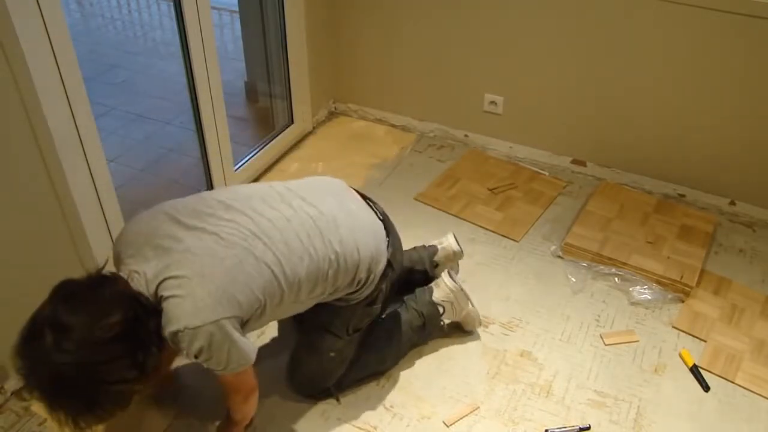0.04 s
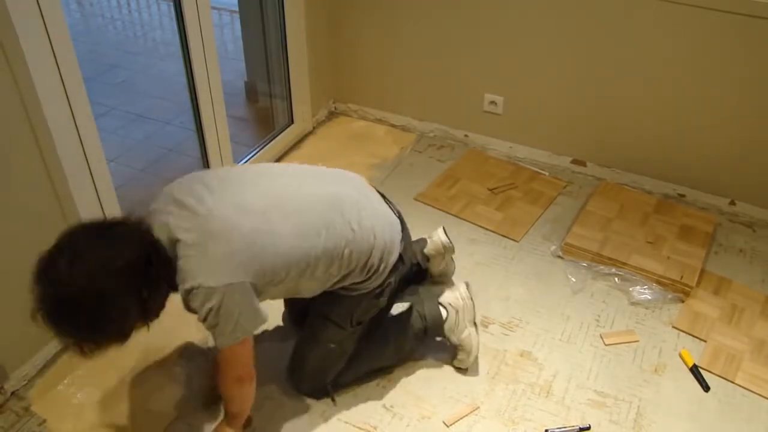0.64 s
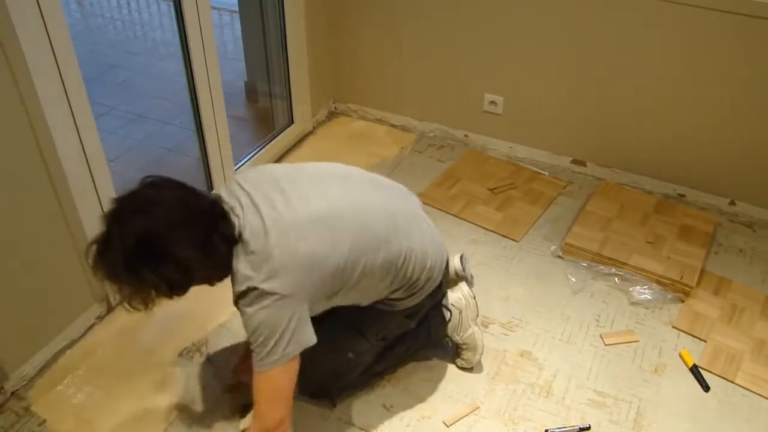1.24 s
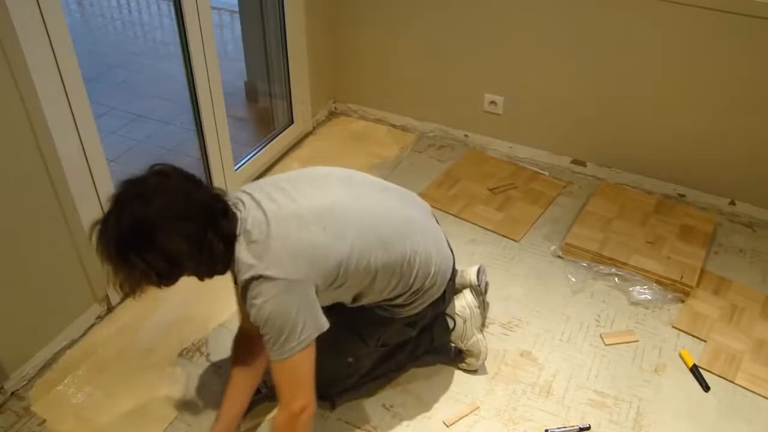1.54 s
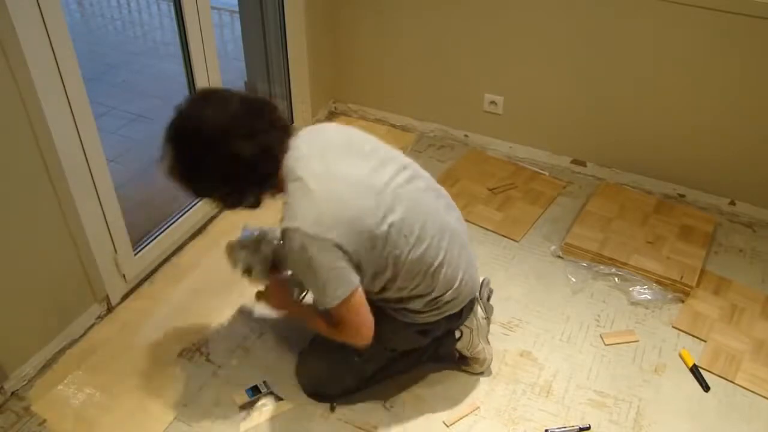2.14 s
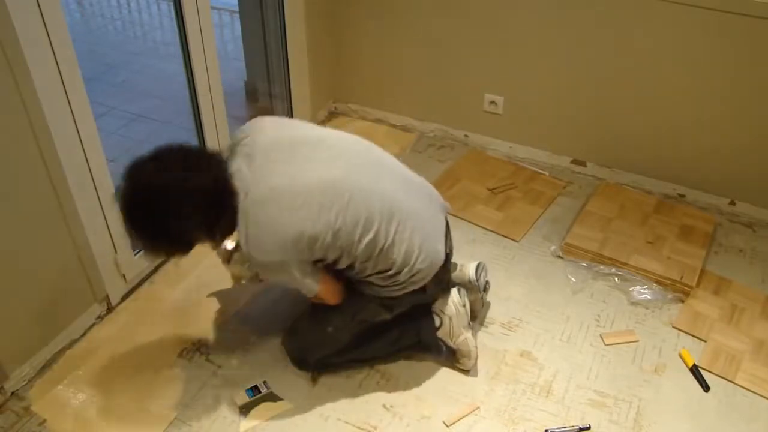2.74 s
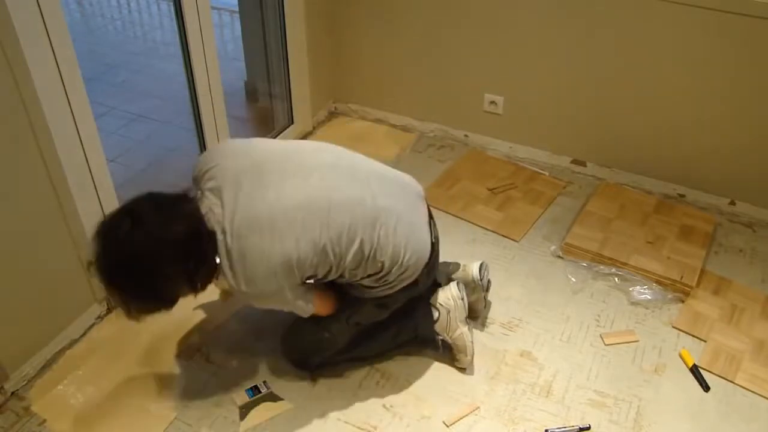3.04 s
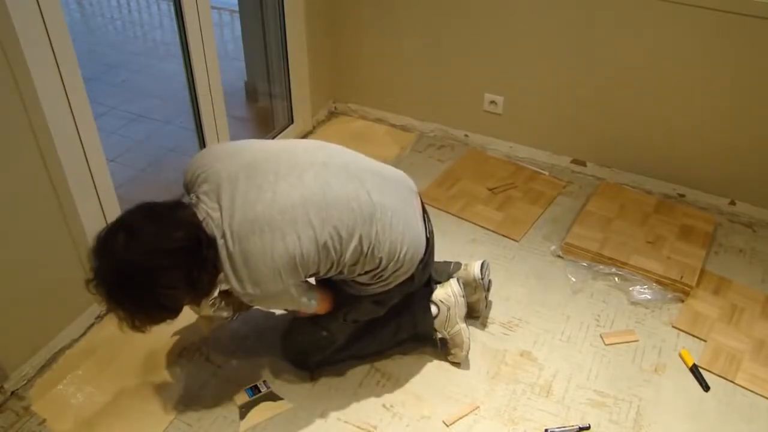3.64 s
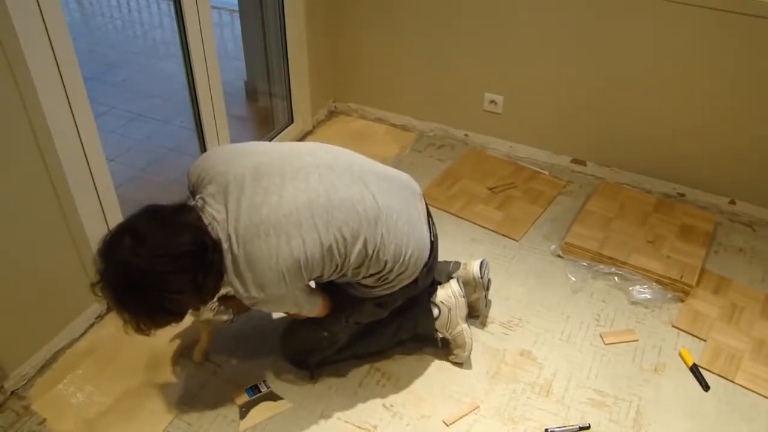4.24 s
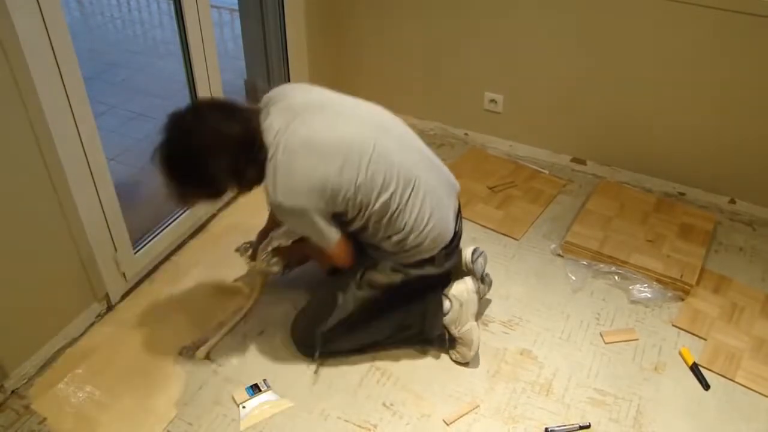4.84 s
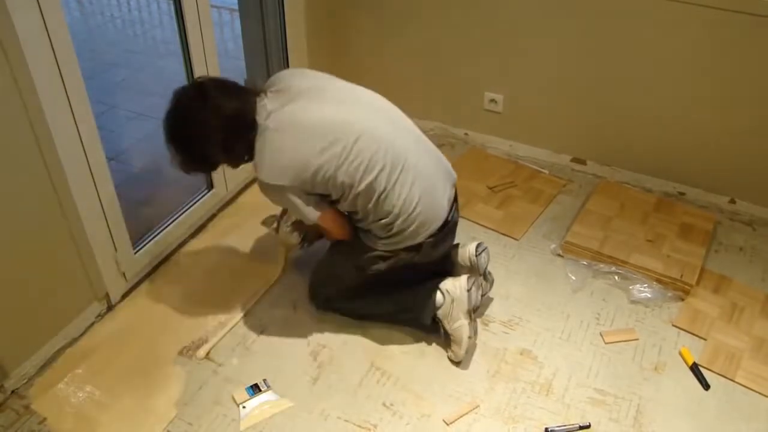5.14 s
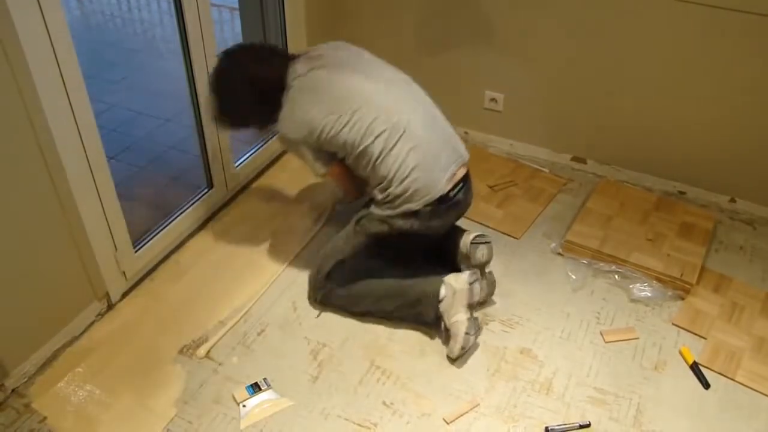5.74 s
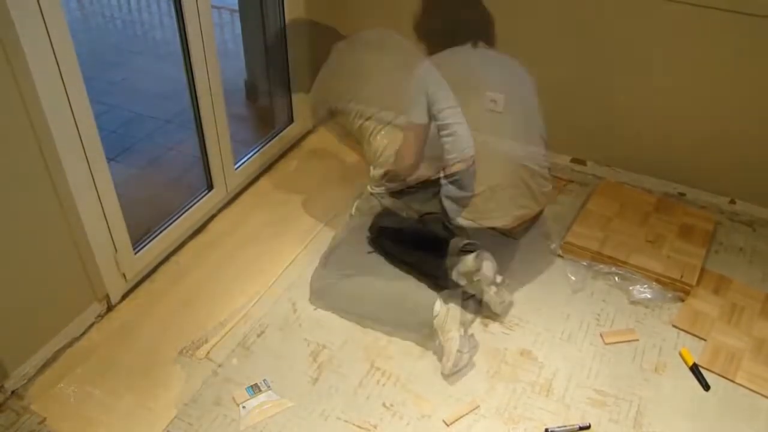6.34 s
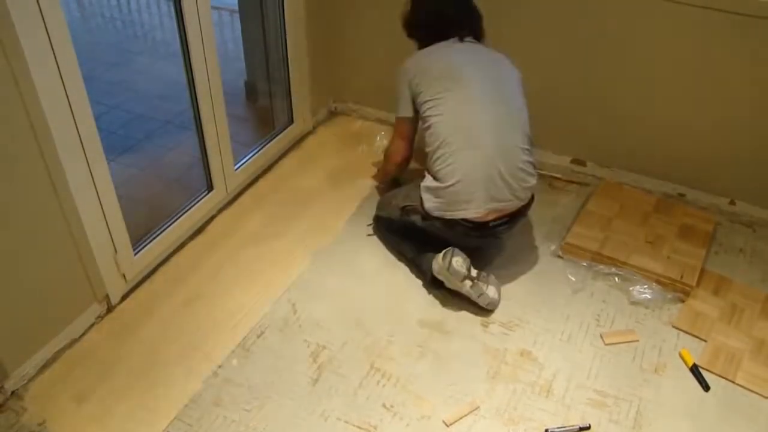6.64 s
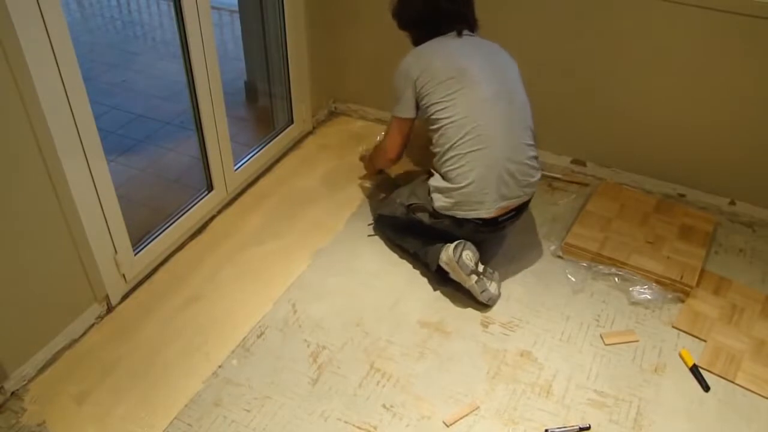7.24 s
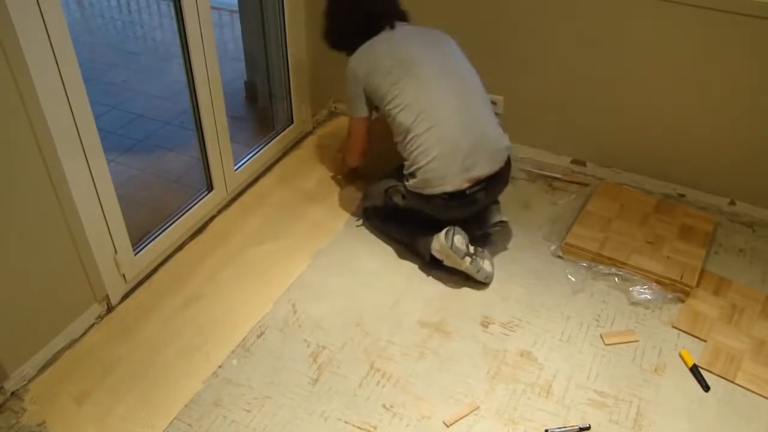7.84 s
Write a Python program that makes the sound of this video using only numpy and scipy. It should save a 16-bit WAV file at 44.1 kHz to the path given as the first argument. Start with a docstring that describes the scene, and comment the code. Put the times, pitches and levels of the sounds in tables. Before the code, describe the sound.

In a bare room, long ringing trowel scrapes give way to shuffling and light crinkling before short, juddering scrapes return.

```python
"""A bare, echoing room; one microphone within earshot of a kneeling worker spreading floor adhesive.
First a steel trowel rasps over the concrete in long strokes, its blade singing; twice the tone overloads
with a click. From 2 s knees and shoes shuffle along while a foil pouch, squeezed out, crinkles and creaks,
the crinkles more echo than direct sound. From 6 s the trowel scrapes and judders in the corner."""
import sys
import numpy as np
from scipy import signal
from scipy.fft import rfft, irfft
from scipy.io import wavfile

SR = 44100
rng = np.random.default_rng(int(sys.argv[2]) if len(sys.argv) > 2 else 0)


def generate_wav(signal):
    """Clip the signal to [-1, 1] and save it as 16-bit WAV at the path in sys.argv[1]."""
    frames = np.transpose(np.atleast_2d(signal))
    scaled = np.clip(frames, -1, 1) * 32767
    pcm = np.round(scaled).astype(np.int16)
    wavfile.write(sys.argv[1], SR, pcm)


N = 357651
TIME = np.arange(N) / SR
FREQS = np.maximum(np.arange(N // 2 + 1) * SR / N, 1)

# Levels in the tables are relative; each source adds its own gain.
# Reverberation of the bare walls: frequency_hz, t60_s
WALL_DECAY = [(200, 1.2), (530, 1.2), (1400, 0.71), (3700, 0.6), (7000, 0.55)]
# Spectrum of each sound: frequency_hz, level_db
ROOM_TONE_SPECTRUM = [(88, -57), (150, -30.5), (299, -4.5), (543, -5), (3340, -4.5), (3740, -7.5),
                      (6250, -19.5), (7000, -41.5), (9100, -72), (15400, -120)]
SHUFFLE_SPECTRUM = [(53, -83.5), (90, -38.5), (228, -19), (346, -12), (439, -11), (567, -4.5), (609, -5.5),
                    (944, 2.5), (1380, 1.5), (1790, 0.5), (2070, -6), (4360, -22), (5940, -33.5),
                    (7000, -54), (9100, -84), (15400, -120)]
FOIL_SPECTRUM = [(80, -34), (200, -7.5), (600, -11), (1500, 1.5), (2200, -1), (3500, -1.5), (5000, -6),
                 (6800, -22.5)]
CATCH_SPECTRUM = [(100, -51), (300, -10), (700, -14.5), (1500, 0), (2800, -4.5), (4500, -21), (6800, -30.5)]
CORNER_SPECTRUM = [(71, -57.5), (120, -33.5), (172, -37.5), (237, -14), (276, -17), (350, -2), (395, -9),
                   (460, -5.5), (518, -4.5), (940, 1), (1300, 1), (2790, -2.5), (4060, -11), (6320, -28),
                   (7000, -48), (9100, -75), (15400, -120)]
SWEEP_SPECTRUM = [(90, -88.5), (150, -52.5), (230, -37), (320, -25), (390, -24), (440, -19.5), (700, -9.5),
                  (1100, 1), (1400, -1.5), (1750, 3), (2200, -5), (2890, -4.5), (4320, -9), (6250, -24),
                  (7000, -45.5)]
# Resonances that colour the rubbing: centre_hz, width_hz, lift_db
SHUFFLE_RESONANCES = [(238, 21, 1.6), (544, 48, 1.1), (735, 35, 1), (1120, 82, 3)]
CORNER_RESONANCES = [(243, 21, 4.8), (450, 34.4, 4), (640, 44, 4), (837, 35, 3), (958, 45, 2.7),
                     (1130, 40, 2), (1330, 46, 2.4), (1410, 20, 3), (2527, 27, 1.5), (4112, 13, 4)]
BLADE_RESONANCES = [(870, 63, 2), (1500, 62, 3.5), (1560, 39, 0.5), (1665, 40, 6), (2890, 610, 5),
                    (3160, 50, 4.5), (3900, 70, -0.5), (3920, 40, 5), (4300, 36, 4.5)]
# Drags over the floor: start_s, rise_s, length_s, level_db, body_db, grit_db (last two re level_db)
KNEE_SHUFFLES = [(2.04, 0.011, 0.089, -37, -10.5, 8), (2.21, .03, 0.12, -34, -12, -2.5),
                 (2.33, .05, 0.046, -21, -7.5, -6), (2.52, 0.027, 0.18, -33.5, -10, -4),
                 (2.825, 0.033, .1, -38, -14, 3), (3.05, .04, 0.041, -36.5, -8.5, 9.5),
                 (3.2, 0.048, 0.087, -44.5, -8.5, 4.5), (3.32, .03, 0.11, -31, -2.5, 2),
                 (3.46, .03, 0.13, -35.5, -11.5, 4), (3.695, .015, .05, -39.5, -10, 6),
                 (3.85, 0.056, 0.55, -48, 0, 0.5), (4.105, .01, .06, -46, -11.5, 8),
                 (4.28, 0.022, .05, -25, -13, -5.5), (4.31, .05, 0.091, -22.5, -9.5, -8.5),
                 (4.5, .05, 0.22, -41, -9, -6.5), (4.73, .025, .05, -28.5, -20, -10),
                 (4.805, 0.03, 0.095, -20, -15, -4), (4.99, .06, .1, -29, -5, 2),
                 (5.08, .04, 0.037, -30.5, -13.5, 5.5), (5.265, .04, 0.089, -14.5, -15, -5.5),
                 (5.57, 0.018, 0.036, -23.5, -13, -6.5), (5.745, .01, 0.024, -43, -10.5, 3),
                 (5.81, .02, 0.018, -38, -4.5, 0.5), (5.96, 0.051, .13, -49.5, -12, 2)]
CORNER_SCRAPES = [(6.19, 0.013, .04, -33, -9, 4), (6.235, .01, .09, -22, -17, -1.5),
                  (6.29, .09, 0.2, -18, -10.5, -5), (6.66, .04, .08, -34.5, -11, 3.5),
                  (6.75, 0.025, 0.048, -30, -8.5, 1), (6.94, 0.065, 0.18, -30.5, -10.5, -7),
                  (7.08, .05, 0.24, -31.5, -8, -2.5), (7.258, .016, 0.062, -13.5, -3.5, -4),
                  (7.38, .06, 0.22, -16, -5.5, -5.5), (7.52, 0.028, 0.074, -16, -9, -4.5),
                  (7.67, 0.033, 0.086, -25.5, -7, -4.5), (7.83, .11, 0.13, -13.5, -15, -3.5),
                  (8.0, .05, 0.13, -26.5, -4, -2)]   # choppy trowel strokes
TROWEL_SWEEPS = [(0.0, 0.002, 0.16, -24.5, -9, -1.5), (0.39, 0.03, 0.12, -41, -17, -1),
                 (0.481, 0.013, .055, -23.5, -20, -6), (0.542, 0.023, 0.029, -22.5, -2.5, 5.5),
                 (0.57, 0.022, 0.18, -16.5, -25.5, 0.5), (0.83, 0.022, 0.1, -23, -8.5, -8.5),
                 (1.09, 0.035, 0.045, -33, -7, 4), (1.14, 0.014, 0.054, -24, -7.5, 3.5),
                 (1.228, 0.013, 0.15, -20.5, -10.5, 4), (1.4, .04, 0.1, -31.5, -14, 5),
                 (1.55, 0.035, 0.07, -26, -18, 2), (1.67, 0.016, 0.033, -36.5, 1.5, -3),
                 (1.78, .012, 0.015, -44.5, -13.5, 9.5), (1.93, .06, .1, -45, -5, 2.5)]   # long trowel strokes
# Friction tones: start_s, rise_s, length_s, level_db, pitch_hz
POUCH_CREAKS = [(2.12, .02, 0.049, -33, 1520), (2.62, 0.014, 0.069, -40.5, 1690),
                (2.75, 0.017, 0.026, -35.5, 1820), (2.83, .03, .14, -39, 1920)]
BLADE_JUDDERS = [(7.265, .015, .08, -23, 338), (7.54, .04, 0.12, -23, 369.2)]   # against the floor in the corner
BLADE_DAMPED_RING = [(0.0, .02, .17, -26.5, 1230), (0.57, .05, .2, -17.5, 1360),
                     (1.235, 0.015, .07, -17.5, 1580), (6.33, .11, .15, -23, 1532),
                     (7.86, .09, .12, -22.5, 1383)]   # below the main ring
BLADE_MAIN_RING = [(0.0, .02, 0.1, -34, 1615), (0.565, .05, 0.083, -10.5, 1643),
                   (0.68, .04, 0.079, -18.5, 1677), (1.15, .01, .08, -19.5, 1623),
                   (1.232, 0.0091, 0.11, -8.5, 1690), (1.38, .03, .085, -12.5, 1715),
                   (1.52, .03, .045, -21.5, 1710), (1.62, .03, 0.078, -26, 1712),
                   (1.8, 0.051, .17, -42, 1670)]   # set off by the long strokes
# Folds of the pouch buckling: time_s, level_db, ring_hz
FOIL_FOLDS = [(2.0495, -13.5, 3070), (2.1364, -25.5, 1530), (2.642, -38.5, 1740), (2.757, -17.5, 1850),
              (2.8243, -11.5, 3070), (3.0042, -18, 1910), (3.0618, -21, 2570), (3.0932, -18.5, 1880),
              (3.24, -25, 4320), (3.2838, -23.5, 1550), (3.3063, -17.5, 2560), (3.3176, -10, 1780),
              (3.4831, -12.5, 2957), (3.7, -14.5, 3390), (3.9424, -21.5, 1200), (4.0239, -21, 1345),
              (4.1076, -21, 1410), (4.5887, -24.5, 1780)]
# Steel or shoe lands and catches on the concrete: time_s, level_db
FLOOR_CATCHES = [(0.489, -14), (1.147, -3.5), (1.237, 2.5), (4.298, -23), (4.75, -21.5), (4.823, -26.5),
                 (5.283, -13.5), (5.581, -15), (6.198, -28.5), (6.236, -19.5), (7.270, 2)]
# Overload clicks: time_s, depth_full_scales, half_length_s
OVERLOAD_CLICKS = [(0.7117, 1.7, .00001), (1.2741, 2.0, .00003)]

# How a push eases off: sag_db_per_s, release_db_per_s
SHUFFLE_EASING, CORNER_EASING, SWEEP_EASING, TONE_EASING = (12, 101.5), (10, 75), (14, 80), (15, 160)
FLAT_SHARE, SETTLE_S = .035, .06   # a tone starts flat and rises to pitch as the pressure builds
BODY_EDGE_HZ, GRIT_EDGE_HZ = 700, 2400
MIC_TOP_HZ, CUTOFF_HZ = 6650, 15800


def from_db(db):
    """Decibels to gain."""
    return 10 ** (np.asarray(db) / 20)


def rms_one(x):
    """Scale to unit rms."""
    return x / np.sqrt(np.mean(x ** 2) + 1e-20)


def at_hz(points, hz):
    """Read a table along a log-frequency axis."""
    f, value = np.transpose(points)
    return np.interp(np.log(hz), np.log(f), value)


def coloured(x, spectrum, lift_db=0):
    """Minimum-phase filter that follows a spectrum table, plus a lift at each of FREQS."""
    gain = from_db(at_hz(spectrum, FREQS) + lift_db)
    half = 4096
    grid = np.linspace(0, SR / 2, half + 1)
    cepstrum = irfft(np.log(np.interp(grid, FREQS, gain) + 1e-6))
    cepstrum[1:half] *= 2
    cepstrum[half + 1:] = 0
    impulse = irfft(np.exp(rfft(cepstrum)))[:half]
    return signal.oaconvolve(x, impulse)[:N]


def drift(turns_per_s):
    """A smooth random wobble; rms 1."""
    knots = rng.standard_normal(N // 20)
    return rms_one(np.interp(TIME * turns_per_s, np.arange(len(knots)), knots))


def grains(per_s, spread_db):
    """Tiny random snaps, as of sand breaking under an edge, a few of them large; rms 1."""
    sizes = from_db(spread_db * np.minimum(rng.exponential(1, N), 4)) * rng.choice([-1, 1], N)
    return rms_one(sizes * (rng.random(N) < per_s / SR))


def burst(start_s, decay_s, texture):
    """A sudden contact that dies away; its power starts near one."""
    fade = (TIME >= start_s) * np.exp(-np.clip((TIME - start_s) / decay_s, 0, 50))
    return rms_one(texture * fade) * np.std(fade)


def push(start_s, rise_s, length_s, easing):
    """Gain of one push: it builds up, sags while held, and dies away when let go."""
    sag_db_per_s, release_db_per_s = easing
    t = TIME - start_s
    held_s = np.clip(t - rise_s, 0, max(length_s - rise_s, 0))
    released_s = np.maximum(t - length_s, 0)
    fall_db = np.clip(sag_db_per_s * held_s + release_db_per_s * released_s, 0, 200)
    return np.clip(t / rise_s, 0, 1) * from_db(-fall_db)


def room_tone():
    """The faint, steady hiss of the quiet room."""
    return from_db(-53) * rms_one(coloured(rng.standard_normal(N), ROOM_TONE_SPECTRUM))


def walls(x, wet_db):
    """Bare walls answer with a dense tail in which the lows last longest; wetter sounds farther off."""
    t, tail = TIME[:SR], 0
    edges_hz = np.geomspace(90, 9000, 9)
    for low, high in zip(edges_hz, edges_hz[1:]):
        bandpass = signal.butter(2, [low, high], "band", fs=SR, output="sos")
        decay = np.exp(-np.log(1000) * t / at_hz(WALL_DECAY, np.sqrt(low * high)))
        tail = tail + signal.sosfilt(bandpass, rng.standard_normal(SR)) * decay
    tail = tail * (t > .003)   # the echo trails the direct sound
    echo = rms_one(signal.oaconvolve(x, tail)[:N]) * np.std(x)
    return (x + from_db(wet_db) * echo) / np.hypot(1, from_db(wet_db))


def wandering(x, depth=.42, turns_per_s=12, q=20.8):
    """The point of contact shifts, so narrow bands of the rasp swell and fade."""
    bands = (signal.lfilter(*signal.iirpeak(hz, q, fs=SR), x) for hz in np.geomspace(700, 6000, 20))
    return x + depth * sum(drift(turns_per_s) * band for band in bands)


def rubbing(strokes, easing, colour, resonances, middle_db, grains_per_s, spread_db, slips_per_s, slip_db):
    """A drag over gritty concrete sticks and slips; weight brings out the body, a sharp edge the grit."""
    power = np.array([(from_db(db) * push(start_s, rise_s, length_s, easing)) ** 2
                      for start_s, rise_s, length_s, db, _, _ in strokes])
    body_db, grit_db = np.transpose(strokes)[-2:]
    contact = rms_one(grains(grains_per_s, spread_db) * from_db(slip_db * drift(slips_per_s)))
    lift_db = sum(db / (1 + (2 * (FREQS - hz) / width) ** 2) for hz, width, db in resonances)
    spectrum = rfft(coloured(wandering(contact), colour, lift_db))
    body = 1 / (1 + (FREQS / BODY_EDGE_HZ) ** 8)
    grit = 1 / (1 + (GRIT_EDGE_HZ / FREQS) ** 8)
    bands = [(body, body_db), (1 - body - grit, np.full(len(strokes), middle_db)), (grit, grit_db)]
    return sum(rms_one(irfft(spectrum * band, N)) * np.sqrt(from_db(db) ** 2 @ power)
               for band, db in bands)


def friction_tone(pushes, width_hz, steadiness):
    """Friction feeds one resonance: a narrow, restless tone that follows the pressure."""
    power, weighted_pitch = 1e-20, 1e-20 * pushes[0][-1]
    for start_s, rise_s, length_s, db, pitch_hz in pushes:
        feed = (from_db(db) * push(start_s, rise_s, length_s, TONE_EASING)) ** 2
        glide = 1 - FLAT_SHARE * np.exp(-np.clip((TIME - start_s) / SETTLE_S, 0, 20))
        power = power + feed
        weighted_pitch = weighted_pitch + feed * pitch_hz * glide
    hz = weighted_pitch / power   # the strongest push sets the pitch
    pole = np.exp(-np.pi * width_hz / SR)
    kicks = rng.standard_normal(N) + 1j * rng.standard_normal(N)
    swing = signal.lfilter([1 - pole], [1, -pole], kicks)
    # friction limits the swing, so its strength varies less than its phase
    swing = swing / (np.abs(swing) + .26 * np.std(swing)) ** steadiness
    tone = np.real(swing * np.exp(2j * np.pi * np.cumsum(hz) / SR))
    bandpass = signal.butter(2, [hz.min() / 2, hz.max() * 2], "band", fs=SR, output="sos")
    return rms_one(signal.sosfilt(bandpass, tone)) * np.sqrt(power)


def shuffling():
    """Knees and shoes drag along the floor with a dull rasp."""
    return from_db(-1.5) * rubbing(
        KNEE_SHUFFLES, SHUFFLE_EASING, SHUFFLE_SPECTRUM, SHUFFLE_RESONANCES,
        middle_db=-2, grains_per_s=7000, spread_db=1.5, slips_per_s=150, slip_db=.1)


def pouch_creak():
    """The pouch creaks higher each time it is wrung tighter."""
    return from_db(2.5) * friction_tone(POUCH_CREAKS, width_hz=180, steadiness=.2)


def pouch_crinkle():
    """Each fold of foil buckles with a crack, a quick run of snaps and a dull ring of its own."""
    snaps, folds = grains(per_s=5500, spread_db=1.5), 0
    for time_s, db, ring_hz in FOIL_FOLDS:
        fold = burst(time_s, decay_s=.008, texture=snaps) + 1e-18
        fold[round(time_s * SR)] += 4   # the crack
        ring = signal.lfilter(*signal.iirpeak(ring_hz, 2, fs=SR), fold)
        folds = folds + from_db(db) * (fold + from_db(-.5) * ring)
    return from_db(-.5) * coloured(folds, FOIL_SPECTRUM)


def catches():
    """A hard edge crunches into the grit as it lands."""
    crunch = grains(per_s=5500, spread_db=4)
    blows = sum(from_db(db) * burst(time_s, decay_s=.0087, texture=crunch) for time_s, db in FLOOR_CATCHES)
    return from_db(3) * coloured(blows, CATCH_SPECTRUM)


def trowel_rasp():
    """The steel edge grinds over concrete: long sweeps first, then choppy scrapes in the corner."""
    sweeps = rubbing(TROWEL_SWEEPS, SWEEP_EASING, SWEEP_SPECTRUM, BLADE_RESONANCES,
                     middle_db=3.5, grains_per_s=6000, spread_db=1, slips_per_s=160, slip_db=-.34)
    corner = rubbing(CORNER_SCRAPES, CORNER_EASING, CORNER_SPECTRUM, CORNER_RESONANCES,
                     middle_db=0, grains_per_s=6000, spread_db=0, slips_per_s=130, slip_db=.05)
    return from_db(-2) * sweeps + from_db(-1) * corner


def blade_song():
    """Friction sets the blade ringing in two modes and, in the corner, juddering."""
    main_ring = friction_tone(BLADE_MAIN_RING, width_hz=38, steadiness=.7)
    judder = friction_tone(BLADE_JUDDERS, width_hz=22, steadiness=.45)
    damped_ring = friction_tone(BLADE_DAMPED_RING, width_hz=97, steadiness=.3)
    return from_db(-1) * main_ring + from_db(-2.5) * judder + damped_ring


def scene():
    """At the microphone, in mono: the scrapes arrive mostly direct, the ticks mostly off the walls."""
    scrapes = shuffling() + pouch_creak() + trowel_rasp() + blade_song()
    ticks = pouch_crinkle() + catches()
    return (room_tone() + walls(scrapes, wet_db=-7) + walls(ticks, wet_db=4))[None]


def record(dry):
    """A narrow-band microphone rounds loud peaks; at two set moments a full-scale crest folds over."""
    thin = signal.sosfilt(signal.butter(2, 70, "high", fs=SR, output="sos"), dry)
    rounded = thin / (1 + (thin / .82) ** 8) ** .125
    heard = signal.sosfilt(signal.ellip(8, .3, 80, MIC_TOP_HZ, fs=SR, output="sos"), rounded)
    for time_s, depth, half_length_s in OVERLOAD_CLICKS:
        t = TIME - round(time_s * SR) / SR
        moment = np.exp(-(t / .0006) ** 2)
        crest = np.cos(2 * np.pi * 1650 * t)   # near the blade's pitch
        fold = depth * np.exp(-(t / half_length_s) ** 2)
        heard = heard * (1 - moment) + moment * (crest - fold)
    return signal.sosfilt(signal.ellip(10, .2, 80, CUTOFF_HZ, fs=SR, output="sos"), heard)


dry = scene()
out = record(dry)
generate_wav(out)
```